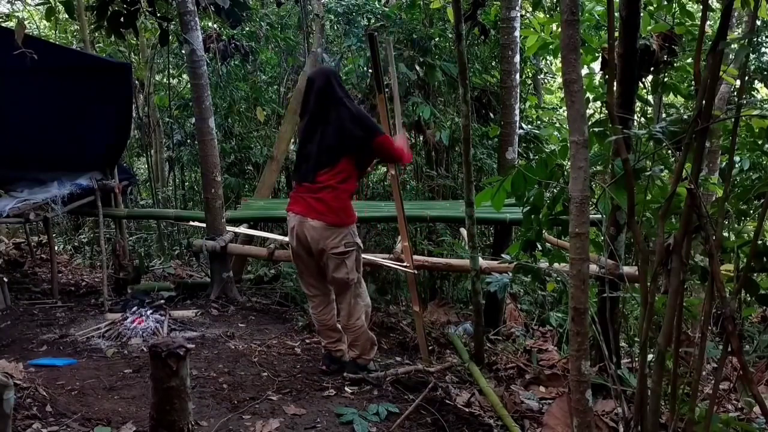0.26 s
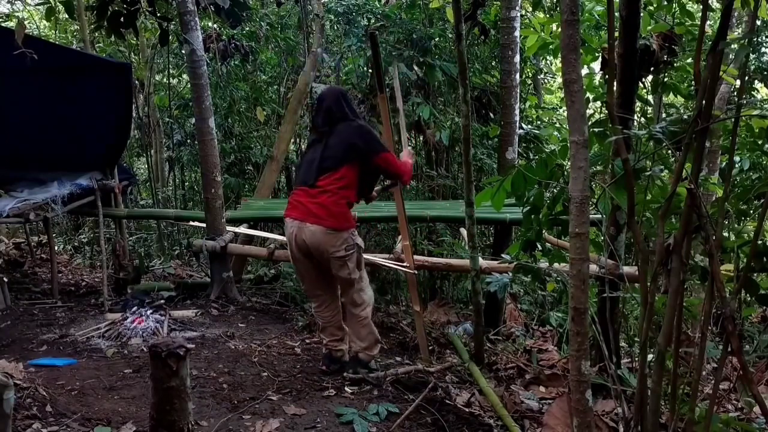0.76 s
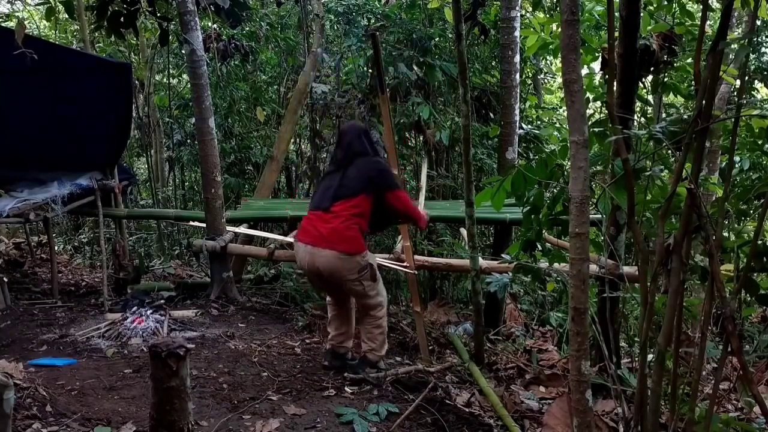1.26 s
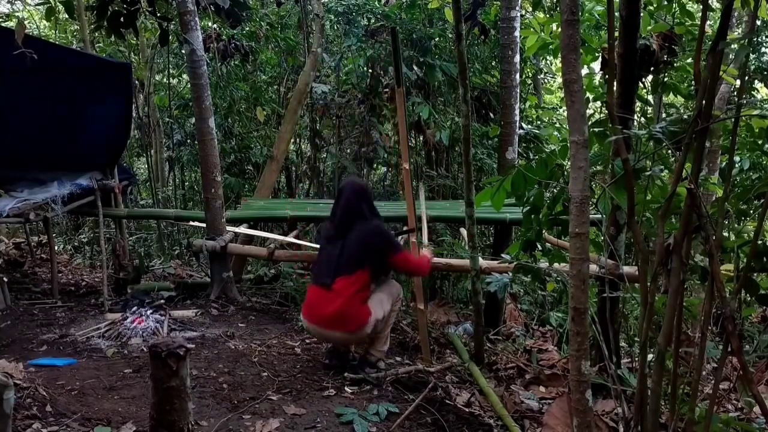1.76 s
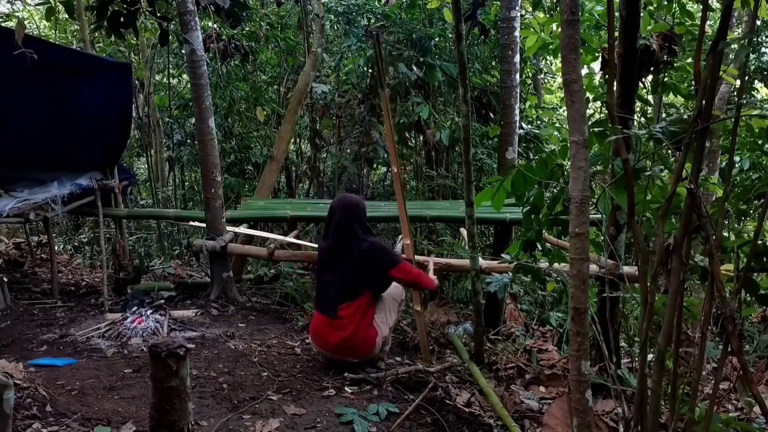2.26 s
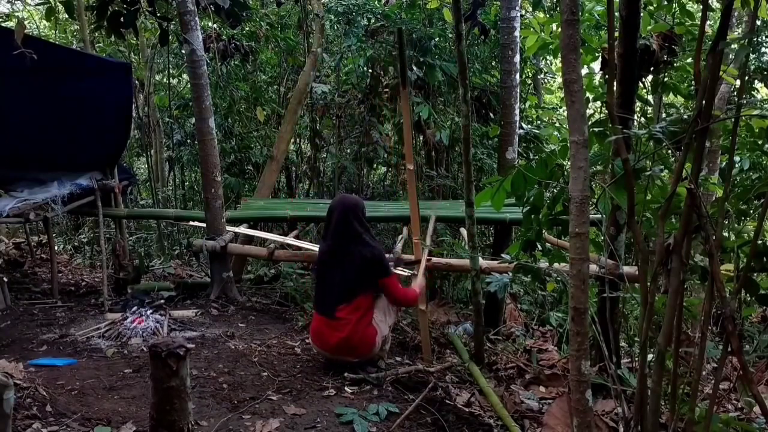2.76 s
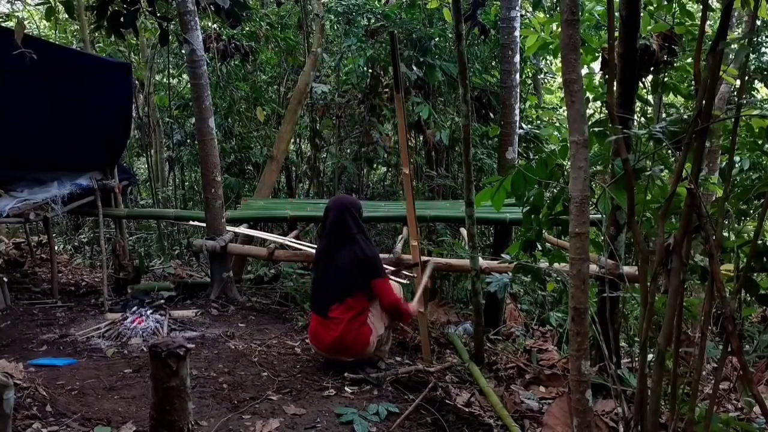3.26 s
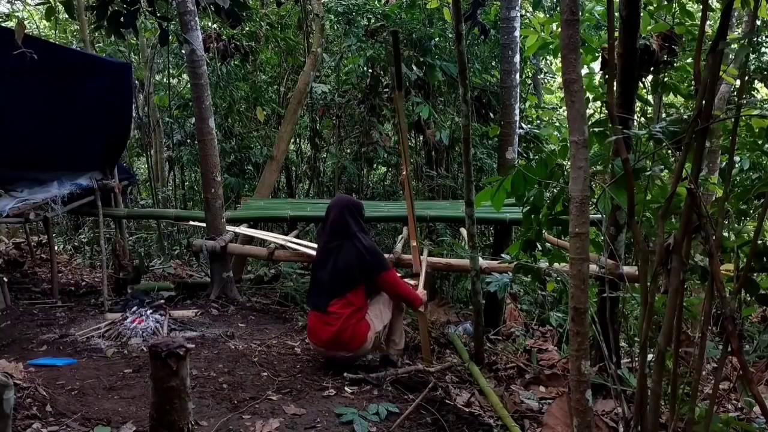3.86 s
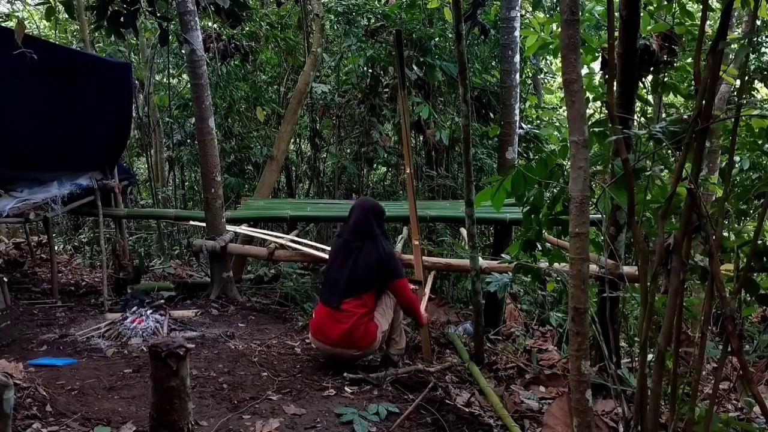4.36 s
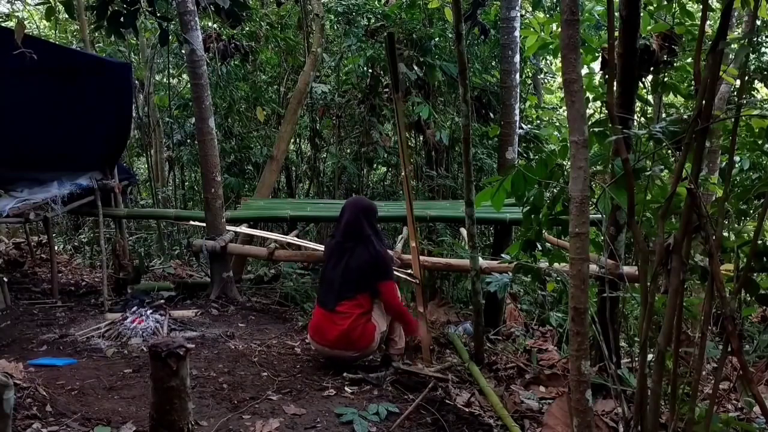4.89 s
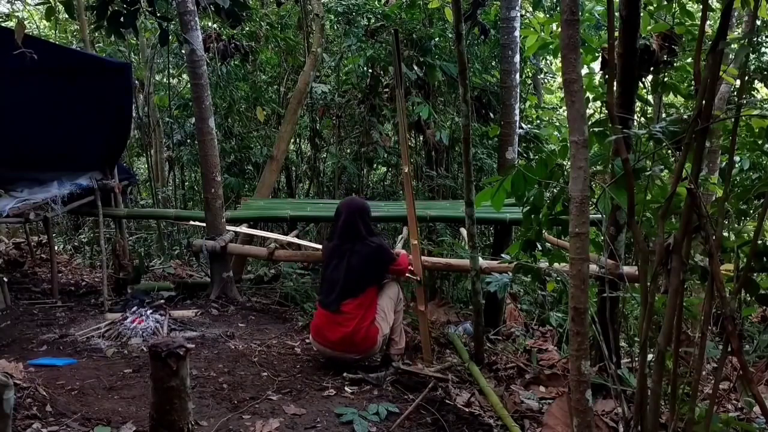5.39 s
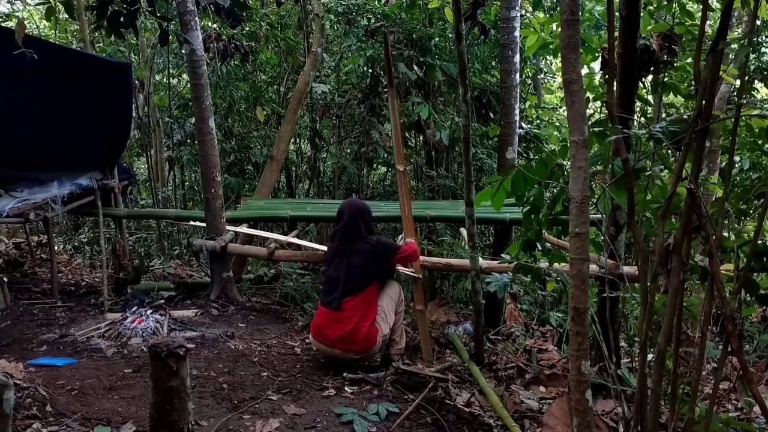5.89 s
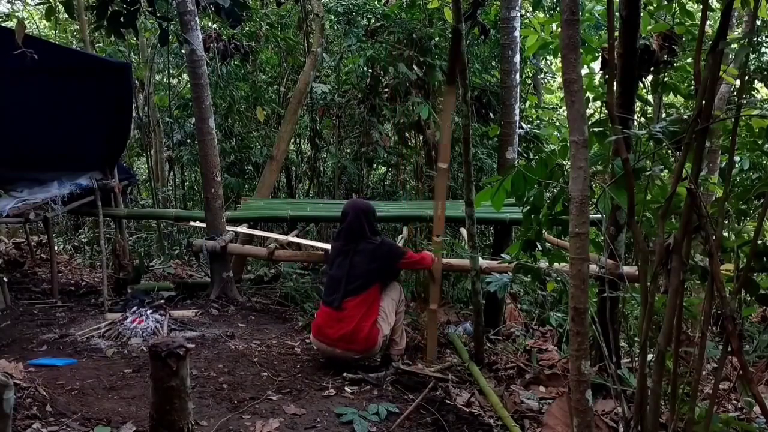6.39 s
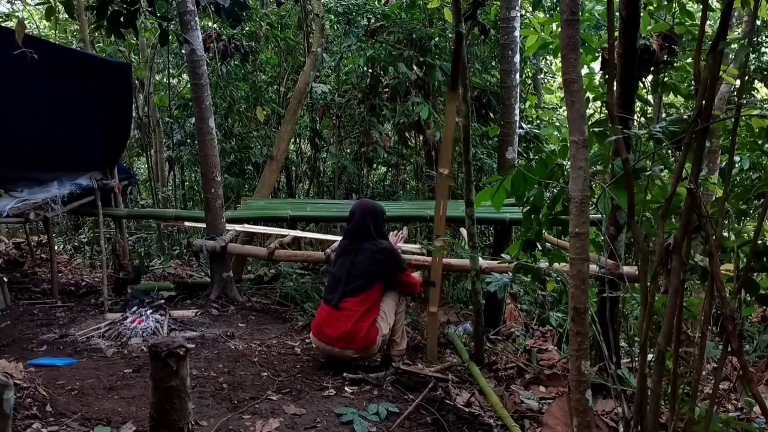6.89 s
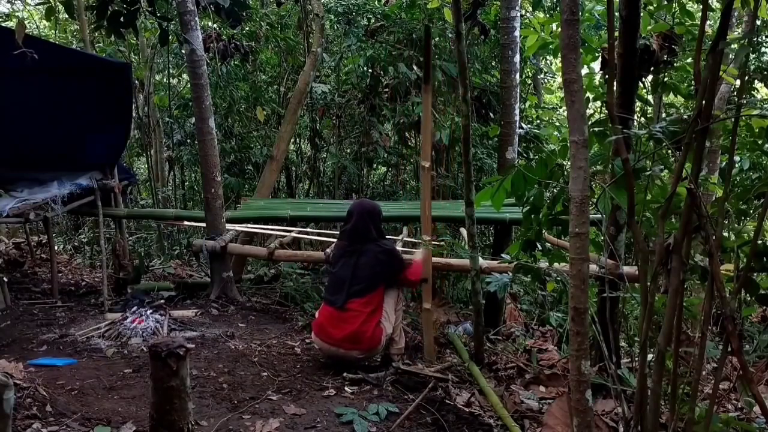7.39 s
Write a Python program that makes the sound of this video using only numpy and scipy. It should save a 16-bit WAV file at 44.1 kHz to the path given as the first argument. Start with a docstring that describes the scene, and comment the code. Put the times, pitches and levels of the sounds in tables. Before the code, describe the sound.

Someone chops at a hollow bamboo pole with a blade in a forest, dry knocks and rustling leaves amid whining, buzzing cicadas.

```python
"""In a tropical forest, someone chops at a standing bamboo pole with a long blade, a few metres off.
Each blow rings the hollow cane as fading sine waves and splits fibres in a shower of noise snaps.
Leaf litter rustles under the pole and feet in softer showers of snaps.
Cicadas whine upwards, buzz and rasp, each built from overtones of its click rate.
Behind them lie still air, a far chorus and a high hiss, all made of shaped noise."""
import sys
import numpy as np
from scipy import signal
from scipy.fft import rfft, irfft, next_fast_len
from scipy.io import wavfile

SR = 44100
rng = np.random.default_rng(int(sys.argv[2]) if len(sys.argv) > 2 else 0)


def transcribe(u):
    """Save the signal u as a 16-bit wav file named by the first command-line argument.

    u: samples, shape (n,) or (channels, n), limited to [-1, 1]; the rate is SR.
    q: integer samples, one column per channel.
    """
    v = np.clip(np.atleast_2d(u).T, -1, 1)
    q = np.round(v * 32767).astype(np.int16)
    wavfile.write(sys.argv[1], SR, q)


N = 336924
TIME = np.arange(N) / SR
DRIFT_TIME = np.arange(2048) / 250  # slow changes are drawn at these times (s)


def amp(db):
    """Turns decibels into a gain."""
    return 10 ** (np.asarray(db) / 20)


def unit(x):
    """Scales a signal to an rms of 1."""
    return x / np.sqrt(np.mean(x ** 2) + 1e-20)


def read(points, hz):
    """Reads a table of (Hz, value) between its points, along a log-frequency axis."""
    point_hz, value = np.transpose(points)
    return np.interp(np.log(hz + 1), np.log(point_hz), value)


def add(mix, start, sound):
    """Adds a sound at a start time in seconds; it may have begun before time zero."""
    at = round(start * SR)
    sound = sound[max(-at, 0):]
    part = mix[max(at, 0):][:len(sound)]
    part += sound[:len(part)]


def hold(t, length, attack, release):
    """Rises from 0 to 1, holds, and is back at 0 after the given length."""
    return np.clip(np.minimum(t / attack, (length - t) / release), 0, 1)


def drift(rate):
    """Slow chance of rms 1 on the coarse time grid, changing about rate times a second."""
    hz = np.fft.rfftfreq(len(DRIFT_TIME), DRIFT_TIME[1])
    spectrum = rfft(rng.standard_normal(len(DRIFT_TIME)))
    return unit(irfft(spectrum / (1 + (hz / rate) ** 2)))


def wander(size, rate):
    """Slow chance, one value for each sample."""
    return np.interp(np.arange(size) / SR, DRIFT_TIME, drift(rate))


def colour(x, points):
    """Filters with the given spectrum; the filter has energy 1 and never sounds ahead of its input."""
    hz = abs(np.fft.fftfreq(2048, 1 / SR))
    log_gain = np.log(amp(read(points, hz)))
    taps = np.fft.ifft(np.exp(np.conj(signal.hilbert(log_gain)))).real
    return signal.oaconvolve(x, taps / np.linalg.norm(taps))[:len(x)]


def noise(points, ripple_db):
    """Steady noise whose spectrum many separate singers make finely ribbed above 2 kHz."""
    size = next_fast_len(N)
    hz = np.fft.rfftfreq(size, 1 / SR)
    ribs = np.interp(hz, np.linspace(0, SR / 2, num=900), rng.standard_normal(900))
    gain = amp(read(points, hz) + ripple_db * ribs * (hz > 2000))
    return unit(irfft(rfft(rng.standard_normal(size)) * gain, size)[:N])


def forest_bed():
    """Still air, a throbbing far chorus around one pitch, and a high hiss that comes in long bouts."""
    # Steady forest air and far insects. Each row: frequency in Hz, relative level in dB.
    air_points = [(20, 12.5), (50, 0.5), (100, -0.5), (160, 1), (260, -10), (500, -15.5), (1450, -16),
                  (2150, -0.5), (2450, -2), (2970, -2.5), (3400, -4), (4500, -14.5), (5500, -7.5),
                  (6400, -13.5), (7600, -4), (10300, -7), (12800, 0), (15500, -2)]
    # Far cicadas merged in one band. Each row: frequency in Hz, relative level in dB.
    chorus_points = [(1500, -28.5), (1720, -3.5), (1835, 2), (1950, -9.5), (2200, -33.5)]
    # High hissing insects. Each row: frequency in Hz, relative level in dB.
    hiss_points = [(6000, -34), (9000, -11), (10500, -14), (11300, 3), (12000, -13), (13200, 4),
                   (14100, -17), (14800, 5.5), (15250, 1.5), (15600, -9)]
    # Bouts of high hiss. Each row: start in seconds, end in seconds, level in dB.
    hiss_bouts = [(-.5, 2.29, -43), (3.7, 6.82, -43)]
    rest_db, rise_s, fall_s = -53.5, 0.4, 0.48  # the hiss between bouts, and how each bout comes and goes

    air = amp(-47.5) * noise(air_points, ripple_db=4.5)
    chorus = amp(-59.5 + 1.06 * wander(N, 3.8)) * noise(chorus_points, ripple_db=-12)

    # one voice stands out of the chorus, with a wavering pitch and level
    leader_hz = 1836 + 12 * wander(N, 12.13)
    leader = amp(-56.0 + 2.86 * wander(N, 35)) * np.sin(2 * np.pi * np.cumsum(leader_hz) / SR)

    hiss_db = rest_db + 0.5 * wander(N, 40)
    for start, end, db in hiss_bouts:
        hiss_db += (db - rest_db) * hold(TIME - start, end - start, rise_s, fall_s)
    hiss = amp(hiss_db) * noise(hiss_points, ripple_db=0.5)
    return air + chorus + leader + hiss


def cicada(rate, tones, step, rest_db, fade_db, jitter, halo_db):
    """Tymbal clicks make a stack of lines; paths through the trees make each line fade and flutter."""
    t = np.arange(len(rate)) / SR
    strong = {round(k): db for k, db in tones}
    uneven_rate = rate * (1 + jitter * wander(len(t), 22))
    turn = np.exp(2j * np.pi * step * np.cumsum(uneven_rate) / SR)
    lowest, highest = round(6 / step), round(30 / step)  # from 6 to just under 30 times the click rate
    song, line = np.zeros(len(t)), turn ** lowest
    for k in range(lowest, highest):
        flutter = 1 + amp(halo_db) * (drift(46) + 1j * drift(41))
        paths = flutter * np.exp(2j * np.pi * rng.random())
        gain = amp(strong.get(k, rest_db) + fade_db * drift(4.3)) * paths
        song += (np.interp(t, DRIFT_TIME, gain) * line).real
        line = line * turn  # on to the next overtone
    return unit(song)


def whines():
    """Each whine scoops up and climbs, swells at the body's resonance, and beats with its trunk echo."""
    # Rising whines. Each row: start in seconds, end in seconds, base click rate in Hz, climb in the
    # first second in Hz, click rate at which the body rings in Hz, level in dB before the swell,
    # trunk echo in dB relative to the whine.
    phrases = [(-.4, .3, 281.0, 21.7, 295, -64, -18), (.37, 1.12, 284.8, 13.7, 295.5, -50.5, -42),
               (1.018, 1.747, 275.5, 20, 295, -59, -26), (1.876, 2.5, 278.7, 20.2, 291.7, -51, -14),
               (2.503, 3.288, 289.8, 18.7, 296, -41, -12.5), (3.704, 4.42, 284.8, 17, 296, -63.5, -20),
               (4.66, 5.726, 269.4, 19.7, 286, -58.5, -27), (4.962, 5.742, 282.1, 19, 296, -50.5, -29),
               (5.876, 6.455, 279.7, 18.3, 292.3, -49.5, -20), (6.986, 7.75, 290.5, 18.3, 296, -40.5, -17)]
    # Strong overtones. Each row: multiple of the click rate, relative level in dB.
    tones = [(8, -18), (9, -6.5), (10, 7), (11, -20), (20, -19.5)]
    scoop_hz, scoop_s, climb_power = 31, 0.033, 0.6  # scoops up to speed, then climbs ever more slowly
    swell_peak_db, body_width_hz = 6.5, 1.05
    trunk_echo_s = 0.0243

    out = np.zeros(N)
    for start, end, base_hz, climb_hz, body_hz, db, echo_db in phrases:
        t = np.arange(0, end - start, 1 / SR)
        rate = base_hz + climb_hz * t ** climb_power - scoop_hz * np.exp(-t / scoop_s)
        swell_db = swell_peak_db * np.exp(-((rate - body_hz) / body_width_hz) ** 2)
        song = cicada(rate, tones, step=1, rest_db=-36, fade_db=0.8, jitter=0.0008, halo_db=-14)
        song = song * amp(db + swell_db) * hold(t, end - start, attack=0.031, release=0.068)
        add(out, start, song)
        add(out, start + trunk_echo_s, amp(echo_db) * song)
    return out


def crackle(t, t60, rise, spread_db):
    """A shower of snaps of uneven size that dies by 60 dB in t60 seconds."""
    size_db = spread_db * np.minimum(rng.exponential(1, len(t)), 4)
    snaps = rng.standard_normal(len(t)) * amp(size_db)
    return unit(snaps) * amp(-60 * t / t60) * (1 - np.exp(-t / rise))


def litter():
    """Dry leaves and twigs crush in short bursts."""
    # Rustles under the pole and feet. Each row: start in seconds, level in dB, time to die by 60 dB
    # in seconds.
    rustles = [(0.0, -47.5, 0.31), (1.238, -48, 0.42), (2.093, -60, 0.31), (2.457, -53, 0.28),
               (2.5, -46, 0.24), (2.67, -55.5, 0.16), (3.94, -43, 0.44), (4.01, -47.5, 0.12),
               (4.211, -50, 0.16), (4.979, -56, 0.16), (7.167, -49, 0.98), (7.234, -49.5, 0.38),
               (7.306, -57, 0.5), (7.417, -55, 0.092), (7.596, -52, 0.065)]
    # Tone of the litter. Each row: frequency in Hz, relative level in dB.
    litter_points = [(80, 0), (250, 0), (600, -1.5), (1300, 4), (2500, 1.5), (4500, -8.5), (9000, -20),
                     (15500, -52)]

    out, t = np.zeros(N), np.arange(SR // 3) / SR
    for start, db, t60 in rustles:
        uneven_gain = amp(db + 1.6 * wander(len(t), 70))
        add(out, start, uneven_gain * crackle(t, t60, rise=0.00042, spread_db=8))
    return colour(out, litter_points)


def chopping():
    """The blade jolts the pole and rings its modes according to where it lands, then fibres tear."""
    # Blows of the blade. Each row: start in seconds, relative knock level in dB, place on the pole
    # (0 high, 1 middle, 2 low), pitch factor, relative thud level in dB, relative splitting level
    # in dB, time for the splitting to die by 60 dB in seconds.
    blows = [(0.5835, -8, 0.085, 1, -20, -29, .05), (.5866, -21, 0.89, 1.03, -46, -29, 0.055),
             (0.596, -30, 0.065, 0.87, -49, -20, 0.17), (0.777, -32, 2.5, 0.91, -51, -51.5, .05),
             (1.1809, -9, 0.34, 0.95, -17.5, -20.5, 0.19), (1.304, -31, 0.97, 0.74, -39, -39, .06),
             (1.4203, -22, 1.27, 1.09, -66, -44, 0.19), (1.7585, -16, 0.98, 1.0, -21.5, -30.5, 0.16),
             (2.368, -21.5, 0.86, 0.98, -26, -23, 0.19), (3.858, -46, 1, 0.39, -60, -33.5, 0.09),
             (3.8806, -10.5, 1.99, 1.044, -20.5, -27, 0.21), (4.4069, -29.5, 1.6, 1.08, -52, -31, 0.053),
             (4.4423, -19.5, 1.57, 0.98, -18, -27, 0.051), (4.4524, -48, 0.82, 0.53, -53, -34, 0.11),
             (7.2126, -30, 0.5, 1.23, -46, -54, 0.032), (7.31, -40, 1.2, 1.08, -62, -40, .05)]
    # Ways the pole can ring. Each row: frequency in Hz before the pitch factor, time to die by 60 dB
    # in seconds before the soil's damping, relative level in dB when struck high, in the middle, low.
    pole = [(650, 0.074, -57, -19, -25), (738, 0.053, -8, -20, -38), (875, 0.12, -18, -14.5, -69),
            (1080, .03, -14, -47, -48), (1216, 0.057, -12.5, -2.5, -17), (1304, 0.22, -24, -21.5, -17),
            (1414, 0.029, -7.5, -5, -56), (1670, 0.039, -36, -7.5, -3), (1696, 0.028, -13, 3, -8.5),
            (2154, 0.027, -18, -3.5, 4.5), (2246, 0.054, 0.5, -35, -11), (2390, .035, -17, -9, -7),
            (2700, 0.073, -25, -7.5, -9), (3205, 0.022, -8, -27, -3.5)]
    # The whole pole jolts. Each row: frequency in Hz, relative level in dB.
    thud_points = [(40, -33), (130, -12), (280, -4), (700, 6.5), (1100, 4), (1800, -7.5), (5000, -38)]
    # Splitting fibres. Each row: frequency in Hz, relative level in dB.
    fibre_points = [(150, -18), (550, -12.5), (1000, -5.5), (2400, 2), (3500, 0), (5200, -8.5), (7000, -8),
                    (8800, 0.5), (11000, -8.5), (15500, -2.5)]

    knocks, jolts, splits = np.zeros((3, N))
    t = np.arange(SR // 4) / SR
    hz, t60, *by_place = np.transpose(pole)
    for start, db, place, pitch, thud_db, split_db, split_t60 in blows:
        # a blow between two places blends their mode levels
        weights = np.maximum(1 - abs(np.clip(place, 0, 2) - np.arange(3)), 0)
        damping = 1 + 0.26 * weights[2]  # the soil deadens blows near the foot
        gains = amp(weights @ np.array(by_place) - 60 * damping * t[:, None] / t60)
        modes = gains * np.sin(2 * np.pi * hz * pitch * t[:, None])
        add(knocks, start, amp(db) * modes.sum(1))
        add(jolts, start, amp([thud_db]))  # a single click, coloured below
        add(splits, start, amp(split_db) * crackle(t, split_t60, rise=0.00016, spread_db=4.0))

    # a thin cane radiates little bass, and the contact time rounds off the treble
    band = signal.butter(4, [560, 4200], "bandpass", fs=SR, output="sos")
    radiated = amp(-7.5) * signal.sosfilt(band, knocks)
    thuds = amp(10.5) * colour(jolts, thud_points)
    tearing = amp(-1.0) * colour(splits, fibre_points)
    return radiated + thuds + tearing


def buzzes():
    """A buzz swells, holds one pitch and dies; the close one is clean, the far ones flutter."""
    # Steady buzzes. Each row: start in seconds, end in seconds, click rate in Hz, level in dB,
    # nearness (1 close by, 0 far).
    phrases = [(1.049, 1.8, 281.4, -51.5, 0), (2.473, 3.104, 283.8, -53, 0), (3.18, 3.934, 298.7, -45.8, 1),
               (5.638, 6.426, 283.3, -52, 0)]
    # Overtones count in half click rates, as the two tymbals differ.
    # Close buzz. Each row: multiple of half the click rate, relative level in dB.
    close_tones = [(17, -3.7), (18, -13.1), (19, 0.0), (21, -14.5), (23, -12.3), (25, -14.3), (31, -16.1),
                   (33, -3.2), (34, -4.7), (35, -7.5), (36, -9.9), (38, -6.7), (39, -15.7), (40, -14.7),
                   (42, -15.5), (46, -12.4), (48, -7.8), (50, -12.4), (53, -12.6), (54, -4.5), (55, -15.3),
                   (56, -8.2)]
    # Far buzzes. Each row: multiple of half the click rate, relative level in dB.
    far_tones = [(19, 0), (21, -0.5), (23, -7), (33, -4.5), (35, -7), (36, -7), (38, -3), (39, -4),
                 (40, -6.5), (42, -11), (44, -3.5), (46, -13), (48, -2), (53, 0.5)]

    out = np.zeros(N)
    for start, end, rate_hz, db, close in phrases:
        t = np.arange(0, end - start, 1 / SR)
        rate = np.full(len(t), rate_hz)
        if close > 0.5:
            song = cicada(rate, close_tones, step=0.5, rest_db=-18, fade_db=0.8, jitter=0.0001, halo_db=-19)
        else:
            song = cicada(rate, far_tones, step=0.5, rest_db=-14, fade_db=2.5, jitter=0.0003, halo_db=-6.5)
        envelope = hold(t, end - start, attack=0.05, release=0.095)
        add(out, start, amp(db) * envelope * song)
    return out


def rasps():
    """A rough phrase that falters briefly as it steps up to a faster click rate."""
    # Rasps. Each row: start in seconds, end in seconds, level in dB before the dip.
    phrases = [(1.9, 2.484, -52), (6.43, 7.135, -50.5)]
    # Strong overtones. Each row: multiple of the click rate, relative level in dB.
    tones = [(6, -3.5), (11, -33), (12, 1), (13, -9.5), (18, -3.5), (19, -7), (24, -4), (25, -3.5)]
    base_hz, climb_hz_per_s = 301.5, 5
    gear_hz, gear_at_s, gear_s, gear_dip_db = 7, 0.29, 0.03, -4  # part-way through, it shifts up a gear

    out = np.zeros(N)
    for start, end, db in phrases:
        t = np.arange(0, end - start, 1 / SR)
        gear = (1 + np.tanh((t - gear_at_s) / gear_s)) / 2  # goes from 0 to 1
        rate = base_hz + climb_hz_per_s * t + gear_hz * gear
        song = cicada(rate, tones, step=1, rest_db=-11, fade_db=1.2, jitter=0.0026, halo_db=-8)
        level = amp(db + gear_dip_db * np.sin(np.pi * gear))
        add(out, start, level * hold(t, end - start, attack=0.1, release=0.15) * song)
    return out


def trees(x, t60, treble_t60, delay):
    """Trunks and leaves scatter the sound back as sparse echoes; low and high tones die at own rates."""
    t = np.arange(SR) / SR
    taps = rng.choice([-1., 1.], SR) * (rng.random(SR) < 2500 / SR) * (t > delay)  # about 2500 a second
    hz, at, bands = signal.stft(taps, SR, nperseg=256)
    decay = read([(900, t60), (5000, treble_t60)], hz)[:, None]
    tail = signal.istft(bands * amp(-60 * at / decay), SR, nperseg=256)[1]
    return signal.fftconvolve(x, tail / np.linalg.norm(tail))[:N]


def cicadas():
    """Three kinds of phrase; the canopy smears the ones that glide."""
    gliding = whines() + rasps()
    canopy = amp(-14) * trees(gliding, t60=1.0, treble_t60=0.15, delay=0.0091)
    return buzzes() + gliding + canopy


def scene():
    """The work on the pole with near and far scatter, among the insects; mono on both channels."""
    work = chopping() + litter()
    near = amp(-8.0) * trees(work, t60=0.16, treble_t60=0.52, delay=0.0031)
    far = amp(-12.5) * trees(work, t60=0.49, treble_t60=0.68, delay=0.02)
    return np.tile(work + near + far + cicadas() + forest_bed(), (2, 1))


def record(dry):
    """The recorder's band limit: a steep filter removes what lies above its edge."""
    edge_hz = 15560
    lowpass = signal.firwin(511, edge_hz, window=("kaiser", 9), fs=SR)
    return signal.oaconvolve(dry, lowpass[None], "same")


dry = scene()
out = record(dry)
transcribe(out)
```